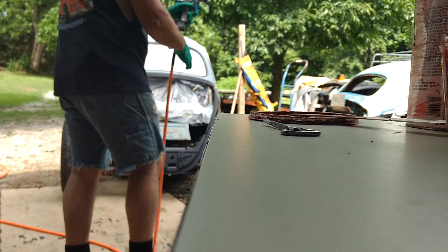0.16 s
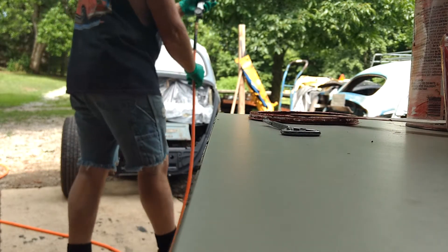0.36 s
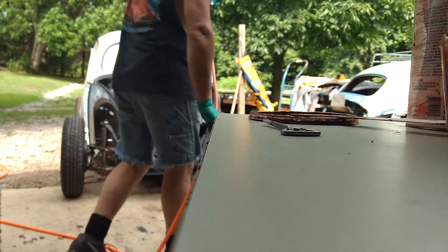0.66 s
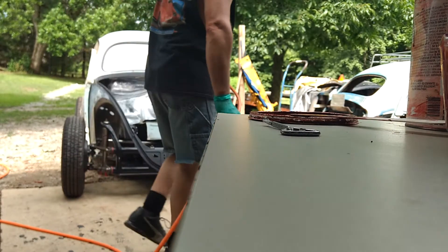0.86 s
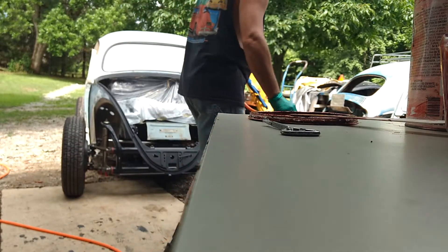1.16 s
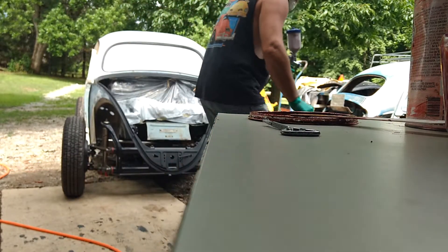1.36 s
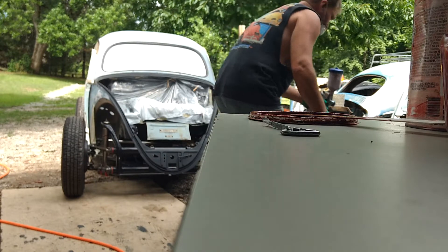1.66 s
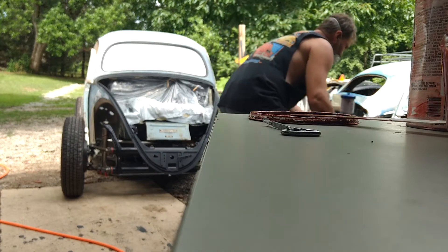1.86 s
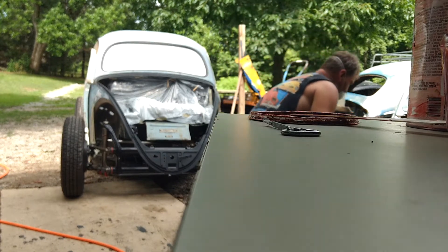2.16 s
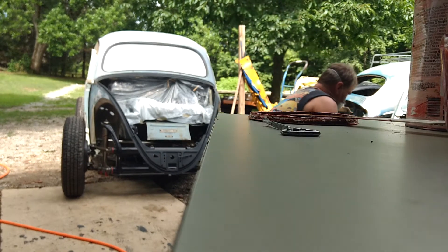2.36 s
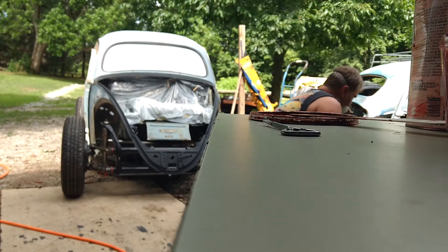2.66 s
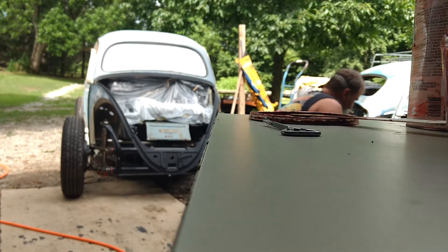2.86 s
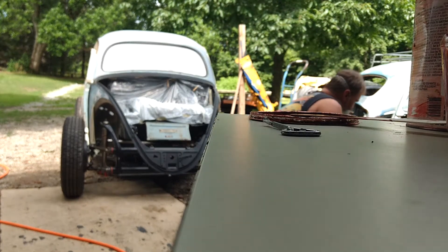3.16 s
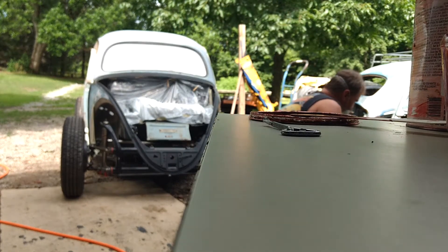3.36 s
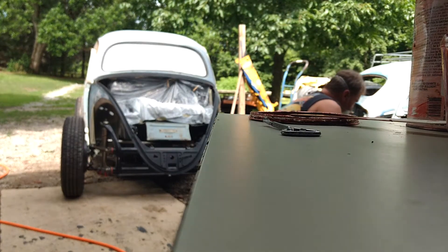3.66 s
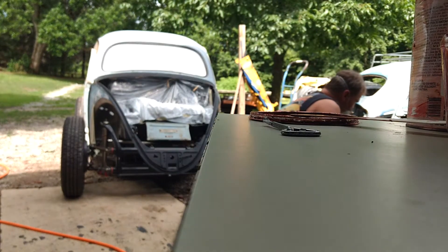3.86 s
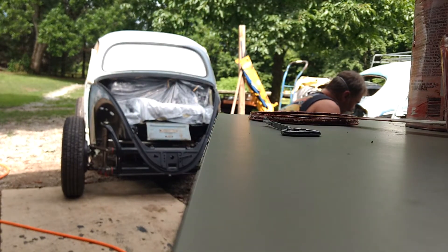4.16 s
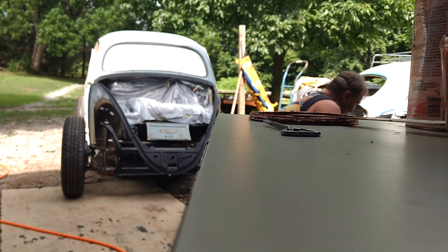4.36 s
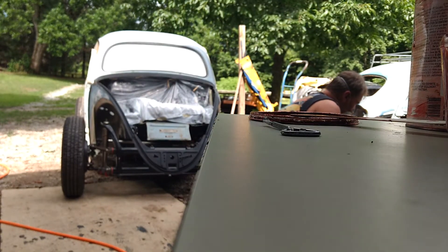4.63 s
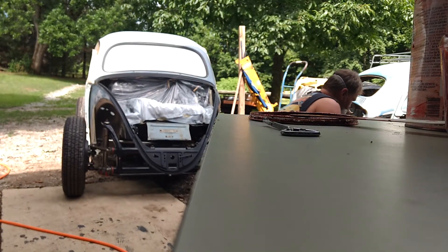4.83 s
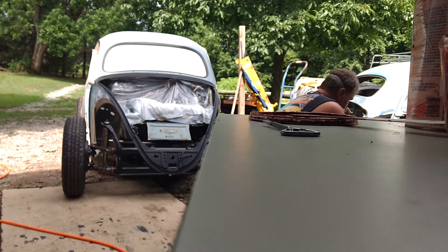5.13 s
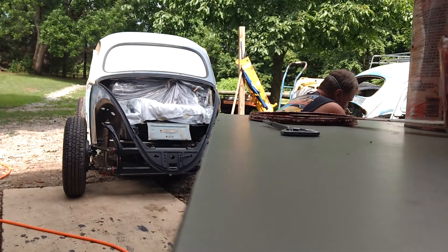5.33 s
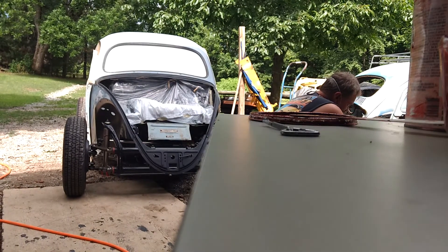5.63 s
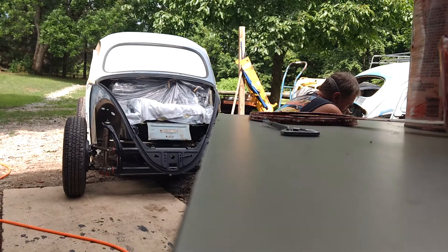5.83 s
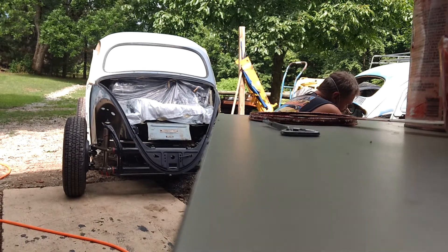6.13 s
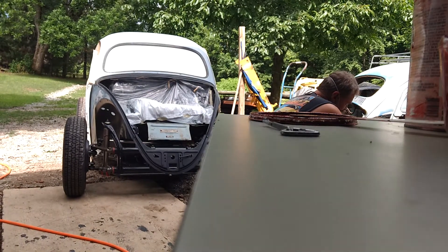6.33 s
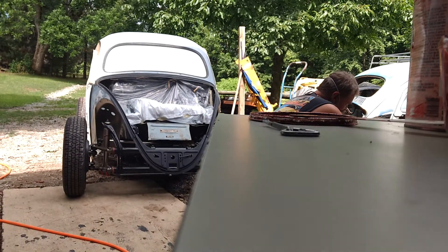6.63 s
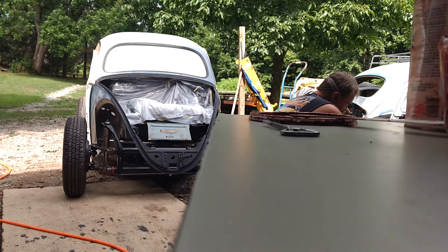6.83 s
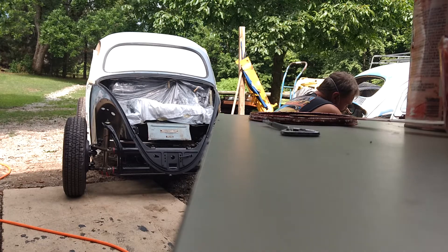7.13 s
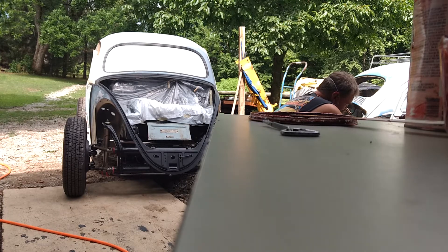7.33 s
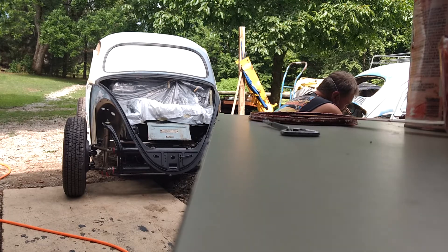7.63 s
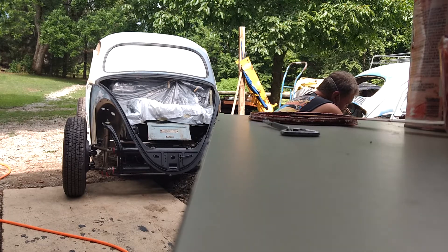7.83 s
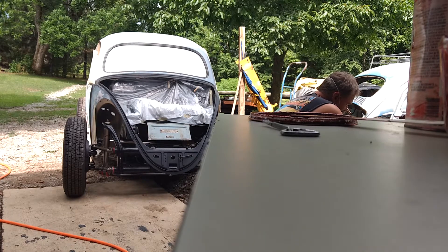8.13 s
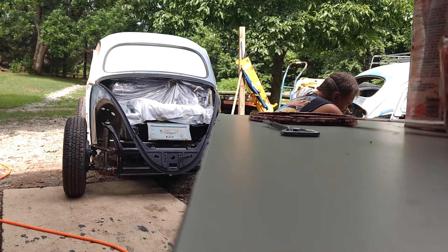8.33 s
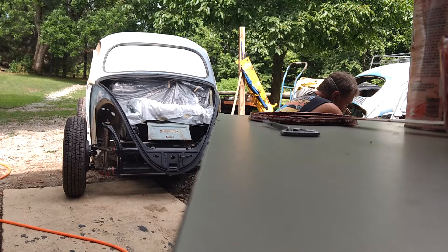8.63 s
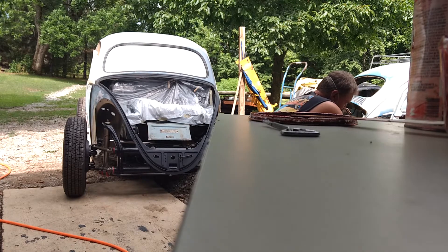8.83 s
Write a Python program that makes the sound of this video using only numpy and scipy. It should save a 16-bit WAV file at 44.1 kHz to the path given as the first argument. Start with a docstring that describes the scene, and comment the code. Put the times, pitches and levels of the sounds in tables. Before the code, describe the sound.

Outdoor spray painting: shuffling and metallic clicks over a low motor hum, then a sharp air hiss, a short gap with a bird chirp, and hissing again.

```python
"""In a yard a nearby machine hums throughout, from a turning motor, a ringing housing and its windings.
First the painter shuffles into place (grainy noise, metallic ticks) and a bird in the trees whistles short notes.
From 2.1 s a compressed-air spray gun hisses, as coloured noise; it stops at 4.3 s and the bird chirps again.
The second pass starts at 5.1 s, just after a tick, and lasts to the end.
The gain control behind the two microphone ports ducks the sound while the gun blows; cross-feed widens the image."""
import sys
import numpy as np
from scipy import signal
from scipy.fft import rfft, irfft, next_fast_len
from scipy.io import wavfile
from scipy.ndimage import uniform_filter1d

SR = 44100
rng = np.random.default_rng(int(sys.argv[2]) if len(sys.argv) > 2 else 0)


def unload_wav(signal):
    """Save mono or channel-first audio to the path in sys.argv[1] as 16-bit WAV at rate SR, clipped to [-1, 1]."""
    wavfile.write(
        sys.argv[1],
        SR,
        np.round(np.clip(np.atleast_2d(signal).T, -1, 1) * 32767).astype(np.int16),
    )


N = 396459
LONG = next_fast_len(N + 4096)  # transform length, padded
BINS_HZ = np.fft.rfftfreq(LONG, 1 / SR)


def gain_of(db):
    """Decibels to amplitude."""
    return 10 ** (np.asarray(db) / 20)


def evened(x):
    """Scales to rms 1."""
    return x / np.sqrt(np.mean(x ** 2) + 1e-20)


def add(mix, s, sound):
    """Mixes a sound in at time s, cut off at the end of the mix."""
    part = mix[..., round(s * SR):][..., :sound.shape[-1]]
    part += sound[..., :part.shape[-1]]


def resonate(x, hz, width):
    """A resonance that can glide: shifts hz down to zero, smooths twice, shifts back."""
    turn = np.exp(2j * np.pi * np.cumsum(hz * np.ones(x.shape[-1])) / SR)
    r = np.exp(-np.pi * abs(width) / SR)
    smooth = signal.lfilter([(1 - r) ** 2], [1, -2 * r, r * r], x / turn)
    return 2 * (turn * smooth).real


def noise(spectrum, patchy_db, flicker_db, size=N):
    """Unrelated noise at both ports, with drifting patches and a flicker common to all pitches."""
    frames = size // 128 + 5
    a, b, c, d, patches = rng.standard_normal((frames, 257, 5)).T
    patches = uniform_filter1d(patches, size=6, axis=0)  # over pitch
    patches = evened(uniform_filter1d(patches, size=24, axis=1))  # over time
    flicker = evened(uniform_filter1d(rng.standard_normal(frames), size=3))
    z = np.array([a + 1j * b, c + 1j * d]) * gain_of(patchy_db * patches + flicker_db * flicker)
    x = signal.istft(z, nperseg=512, noverlap=384)[1][:, :N]
    f, db = np.transpose(spectrum)
    colour = gain_of(np.interp(np.log(BINS_HZ + 1), np.log(f), db))
    return evened(irfft(rfft(x, LONG) * colour, LONG)[:, :size])


def yard(x):
    """Near echoes off panels ripple the colour; a diffuse tail follows, treble dying first."""
    t = np.arange(SR // 2) / SR
    taps = rng.standard_normal((2, len(t))) * np.minimum(t / 0.0042, 1)
    dull = signal.lfilter([.25], [1, -.75], taps)
    bright = taps - dull
    echo = bright * gain_of(-33 - 60 * t / .07)  # 60 dB down in 0.07 s
    echo += dull * gain_of(-31.0 - 60 * t / 0.42)
    echo[:, 0] = 1  # the direct sound
    return signal.oaconvolve(x, echo / np.linalg.norm(echo[0]), axes=1)[:, :N]


# Colour of the machine's rumble and the yard air: f/Hz, relative level per Hz/dB
RUMBLE_COLOUR = [(25, -32), (42, -25), (65, -22), (100, -11.5), (140, -13), (195, -25), (280, -7.5),
                 (355, -13), (430, -7), (550, -8.5), (650, -8), (835, -8), (950, -11.5), (1300, -15.5),
                 (2000, -23), (3000, -31), (5000, -40.5), (9000, -48.5), (16000, -48.5)]
RUMBLE_DB = -39
# Resonances of the housing, shaken by noise: f/Hz, width/Hz, level/dB
HOUSING_PEAKS = [(92, 14, -60), (172, 20, -49.5), (228, 13, -45.5), (322, 16, -55.5), (378.5, 10, -58),
                 (445, 20, -56), (481.5, 14, -44), (518, 15, -46.5), (584, 14, -53), (775, 20, -57),
                 (893.5, 24, -52.5), (1047, 24, -58), (1217, 45, -60)]
MOTOR_HZ = 52.0  # mean shaft speed
# Shaft orders 1, 2, 3 of the motor, at the far port: mean amplitude level/dB
SHAFT_ORDERS_DB = [-61, -51.5, -38]
# Steady electrical hum of the windings: f/Hz, level/dB, share at far port, share at near port
WINDING_HUMS = [(120.1, -52, 1, -.2), (720.3, -50, 0, 1)]


def machine():
    """Close-by machine: broad rumble, ringing housing, wavering shaft orders and electrical hum."""
    out = gain_of(RUMBLE_DB) * noise(RUMBLE_COLOUR, patchy_db=1.0, flicker_db=0.1)
    # each peak is scaled so that white shaking of rms 1 leaves it at its level
    peaks = 0
    for hz, width, db in HOUSING_PEAKS:
        scale = gain_of(db) * np.sqrt(2 * SR / (np.pi * width))
        peaks = peaks + scale / (1 + (2 * (BINS_HZ - hz) / width) ** 2)
    shaking = rng.standard_normal((2, LONG))
    out += irfft(rfft(shaking) * peaks, LONG)[:, :N]
    calm = np.exp(-np.pi * 6 / SR)  # slow random wander
    waver = evened(signal.lfilter([1], [1, -2 * calm, calm ** 2], rng.standard_normal((3, N))))
    turns = np.cumsum(MOTOR_HZ * (1 + 0.0015 * waver[0])) / SR
    for k, db in enumerate(SHAFT_ORDERS_DB):  # orders hold within a decibel or two
        order = gain_of(db + 1.0 * waver[k]) * np.sin(2 * np.pi * ((k + 1) * turns + rng.random()))
        out += [[1], [-.2]] * order  # inverted and weaker at the near port
    for hz, db, far, near in WINDING_HUMS:
        hum = np.sin(2 * np.pi * (hz * np.arange(N) / SR + rng.random()))
        out += gain_of(db) * hum * [[far], [near]]
    return out


BLUR_HZ, CLEAR = 340, .62  # bandwidth of the blur; share of pure whistle


def note(length, first_hz, last_hz, db):
    """One distant whistle, partly blurred by the leaves into narrow noise, with a fading echo."""
    t = np.arange(0, .3, 1 / SR)
    hz = np.interp(t, [0, length], [first_hz, last_hz])
    blur = evened(resonate(rng.standard_normal((2, len(t))), hz, BLUR_HZ))
    whistle = np.sqrt(2) * np.sin(2 * np.pi * (np.cumsum(hz) / SR + rng.random((2, 1))))
    after = np.maximum(t - length, 0)
    direct = (CLEAR * whistle + (1 - CLEAR) * blur) * gain_of(-60 * after / 0.037)
    echo = 0.33 * blur * gain_of(-60 * after / 0.45)
    onset = np.minimum(t / 0.001, 1)
    return gain_of(db) * onset * (direct + echo) * [[.5], [1]]  # half as strong at the far port


# Bird notes from the trees: start t/s, length/s, first f/Hz, last f/Hz, nominal level at near port/dB
BIRD_NOTES = [(.13, .03, 4350, 4150, -60), (.158, .045, 3880, 3850, -54), (.175, .025, 4150, 4100, -58),
              (.205, .035, 3950, 3950, -60), (.2, .03, 3500, 3000, -59), (.222, .025, 3550, 3550, -56),
              (.25, .035, 3550, 3500, -57), (.252, .012, 3250, 3250, -57), (.295, .025, 3600, 3550, -58),
              (.71, .04, 3350, 3250, -56), (.75, .03, 3300, 3000, -59), (1.066, .028, 4330, 4290, -45.5),
              (1.05, .03, 5450, 5700, -60), (1.066, .033, 4900, 4800, -49.5),
              (1.082, .022, 4620, 4500, -47), (1.108, .014, 4350, 4150, -53), (1.09, .03, 3900, 3100, -53),
              (1.125, .02, 3200, 3500, -57), (1.143, .022, 3650, 3400, -51), (1.18, .035, 3550, 3000, -54),
              (1.232, .025, 3000, 3400, -58), (1.27, .05, 3550, 3500, -59), (1.455, .035, 3800, 3750, -58),
              (4.424, .033, 4520, 4480, -39.5), (4.49, .02, 3600, 3800, -56), (4.51, .03, 3600, 3250, -49)]


def bird():
    """Short level or gliding whistled notes."""
    out = np.zeros((2, N))
    for start, *shape in BIRD_NOTES:
        add(out, start, note(*shape))
    return out


# Clothes, hose and shoes rustling: start t/s, length/s, peak level before the grit/dB
RUSTLE_MOVES = [(0.306, 0.13, -56.5), (0.433, 0.29, -59), (0.673, 0.2, -61.5), (.92, 0.12, -60.5),
                (1.028, 0.073, -63), (1.13, 0.084, -58), (1.2, 0.11, -59), (1.25, 0.44, -56),
                (1.68, 0.11, -59), (1.875, 0.047, -60), (1.948, 0.11, -64)]
CRACKLES_PER_S, CRACKLE_DB = 480, -10  # grit in the rustle
# Fittings of the gun ticking: t/s, snap level/dB, ring starting level/dB, f/Hz, width/Hz
FITTING_TICKS = [(0.4994, -62, -68, 5500, 3000), (0.6458, -64, -70, 5450, 3000),
                 (0.9794, -60, -62, 5240, 3000), (1.005, -62, -70, 5340, 3000),
                 (1.1332, -62, -70, 5600, 3000), (1.1634, -58, -70, 5300, 3000),
                 (1.3384, -58, -62, 5540, 3000), (1.3747, -53, -62, 7700, 4000),
                 (1.3806, -51, -66, 6500, 5000), (1.5318, -50, -71, 9000, 5000),
                 (1.5473, -42, -60, 8500, 5000), (1.548, -31, -54, 8800, 9000),
                 (1.548, -42, -66, 14000, 4000), (1.5505, -45, -70, 9500, 4000),
                 (1.5526, -42, -60, 9500, 4000), (1.5533, -34, -52, 9200, 5500),
                 (1.5562, -43, -60, 8500, 3000), (1.7097, -52, -66, 13000, 5000),
                 (1.8866, -48, -56, 14500, 2500), (1.889, -58, -63, 9700, 1200),
                 (1.9766, -59, -65, 8000, 5000), (2.014, -57, -58, 9660, 2000),
                 (5.04, -58, -62, 9000, 4000)]


def painter():
    """Grainy rustle of cloth and hose, and short metallic ticks."""
    moves = np.zeros(N)
    for s, length, db in RUSTLE_MOVES:
        add(moves, s, gain_of(db) * np.sin(np.pi * np.arange(0, 1, 1 / (length * SR))))
    strengths = gain_of(4.6 * np.minimum(rng.exponential(1, N), 4))
    crackles = (rng.random(N) < CRACKLES_PER_S / SR) * strengths
    fade = np.exp(-np.arange(200) / (0.0008 * SR))
    grit = 1 + gain_of(CRACKLE_DB) * evened(signal.oaconvolve(crackles, fade)[:N])
    cloth_colour = [(1500, -47), (4000, 7.5), (7000, 1.5), (10000, 0.5), (12500, -3), (16000, 5)]
    cloth = noise(cloth_colour, patchy_db=1.0, flicker_db=1.5, size=N // 4)
    out = np.zeros((2, N))
    add(out, 0, (moves * grit)[:N // 4] * cloth)  # only the first quarter rustles
    t = np.arange(3000) / SR
    for s, snap_db, ring_db, hz, width in FITTING_TICKS:
        u = t * width / 1.2  # the snap's envelope peaks at u = 1
        snap = np.sin(2 * np.pi * hz * t) * gain_of(snap_db) * u * np.exp(1 - u) * [[1], [1]]
        ring = evened(resonate(rng.standard_normal((2, len(t))), hz, width))
        add(out, s, snap + ring * gain_of(ring_db - 60 * t / 0.16))
    return out


# Trigger pulls: start t/s, opening time/s, release t/s, level before drift/dB
TRIGGER_PULLS = [(2.141, .008, 4.325, -19), (5.108, .005, 9.2, -19)]
LEAK_S, LEAK_DB = 0.016, -20  # a faint leak before the valve opens
BLEED_DB_PER_S = 220  # the hose empties after the release
# Slow drift while spraying: t/s, jet level/dB, duller roar off the panel: level against the jet/dB
SPRAY_DRIFT = [(2.145, -3.5, -15), (2.175, -0.5, -19), (2.6, 1.5, -20), (3.6, 0.5, -20), (4.0, 3, -22),
               (4.12, -2.5, -15), (4.32, 2, -19.5), (5.1, 1.5, -19), (6.0, 1.5, -20.5), (6.6, 1.5, -19),
               (6.8, -1.5, -16), (7.0, 2, -19.5), (7.5, 1, -19.5), (8.99, 1, -19)]
# The flow spits or surges, then drops back at once: end t/s, length/s, rise of level/dB
FLOW_SPITS = [(2.577, 0.023, 5), (3.017, .02, 2), (3.634, 0.078, 6), (4.038, .08, 1), (5.341, 0.034, 3.5),
              (5.785, 0.027, 5), (5.974, 0.044, 5), (6.627, 0.035, 2), (7.396, 0.043, 3), (8.065, .03, 1),
              (8.745, 0.027, 1)]
# Colour of the jet: f/Hz, relative level per Hz/dB
JET_COLOUR = [(200, -65), (700, -11), (1500, -56), (3000, -13.5), (5000, -3.5), (7000, -3), (7700, 0.5),
              (8120, 2.5), (8500, 3.5), (10000, 2.5), (11000, 4), (12500, 3.5), (13200, 7.5), (13700, 1),
              (14500, 10), (15000, 8), (15700, 4.5)]
# Lift of the jet's top as the gun turns: t/s, change of level/dB
TOP_LIFT = [(2.2, 0), (3.2, 0), (4.3, -1.6), (5.2, 0.2), (5.7, -0.5), (6.1, -1.3), (6.5, -0.5),
            (6.78, -0.7), (7.0, -1.5), (7.4, 0.5), (7.9, 0.5), (8.4, -0.5), (8.99, 0)]
TOP_HZ = 11000  # the lift acts above about here


def gun():
    """Turbulent air from the nozzle, now and then spitting or surging for some hundredths of a second."""
    t = np.arange(N) / SR
    s, jet_db, roar_db = np.transpose(SPRAY_DRIFT)
    flow = np.zeros(N)
    for start, opening, release, db in TRIGGER_PULLS:
        valve_s = [start - LEAK_S, start, start + opening]
        valve_db = np.interp(t, valve_s, [2 * LEAK_DB, LEAK_DB, 0], left=-200)
        flow += gain_of(db + valve_db - BLEED_DB_PER_S * np.maximum(t - release, 0))
    level_db = np.interp(t, s, jet_db)
    for end, length, rise_db in FLOW_SPITS:
        add(level_db, end - length, rise_db * np.arange(0, 1, 1 / (length * SR)) ** 2)
    panel = noise([(300, -21), (1300, 10.5), (3500, 12.0), (7000, -8)], patchy_db=2.5, flicker_db=2.0)
    jet = noise(JET_COLOUR, patchy_db=1.18, flicker_db=0.27)
    top = signal.sosfilt(signal.butter(1, TOP_HZ, "high", fs=SR, output="sos"), jet)
    lift = gain_of(np.interp(t, *np.transpose(TOP_LIFT)))
    jet = jet + (lift - 1) * top
    roar = gain_of(np.interp(t, s, roar_db)) * panel
    return flow * gain_of(level_db) * (jet + roar)


def scene():
    """All sources at the far (0) and near (1) port; only gun and bird pass through the yard's echoes."""
    return yard(gun() + bird()) + machine() + painter()


# Microphone port pair: f/Hz, weight of the far port, cross-feed 0-1, extra lag of left/rad,
# left against right level/dB
PORT_PAIR = [(60, 1, .25, 1.8, 4), (130, .8, .55, 2.1, 4), (220, .5, .75, 1.9, 2), (400, .35, .9, 1.5, 1.5),
             (700, .3, .95, .8, .5), (1100, .5, .97, 0.01, .5), (2000, .85, 1, 0, 0), (6900, .75, 1, 0, 0),
             (8500, .5, .7, -.6, -3), (10000, .55, .65, -.4, -2.5), (11000, .55, .6, -.3, -5.5),
             (15000, .65, .5, -.5, -4.7)]
FEED_S = 20 / SR  # delay of the cross-feed
EDGE_HZ = 15760  # upper band limit


def record(dry):
    """Treble-sensing gain control, delayed and inverted cross-feed of the ports, hiss, band limit."""
    treble = signal.sosfilt(signal.butter(2, 4000, "high", fs=SR, output="sos"), dry)
    power = uniform_filter1d((treble ** 2).mean(0), size=300)
    power_db = 10 * np.log10(abs(power) + 1e-12)
    fall = np.arange(N) / (1.15 * SR)  # the cut in dB eases off exponentially
    log_over = np.log(np.maximum(power_db + 41.0, 1e-6))  # excess above -41 dB
    over_db = np.exp(np.maximum.accumulate(log_over + fall) - fall)
    lag = np.exp(-1 / (0.0069 * SR))  # the gain needs a few milliseconds to drop
    cut_db = 0.78 * signal.lfilter([1 - lag], [1, -lag], over_db)
    ducked = dry / gain_of(cut_db)
    f, *columns = np.transpose(PORT_PAIR)
    weight, feed, twist, left_db = (np.interp(np.log(BINS_HZ + 1), np.log(f), c) for c in columns)
    far, near = rfft(ducked, LONG)
    late = np.clip(feed, 0, 1) * np.exp(-2j * np.pi * BINS_HZ * FEED_S)
    left = weight * far - late * near
    right = near - late * weight * far
    left *= gain_of(left_db) * np.exp(-1j * twist) / np.hypot(weight, abs(late))
    right /= np.hypot(1, weight * abs(late))
    wide = irfft(np.array([left, right]), LONG)[:, :N]
    wide = wide + gain_of(-88.0) * rng.standard_normal((2, N))  # hiss of the electronics
    band = signal.firwin(2047, EDGE_HZ, window=("kaiser", 9), fs=SR)
    return signal.oaconvolve(wide, band[None], "same")


dry = scene()
out = record(dry)
unload_wav(out)
```